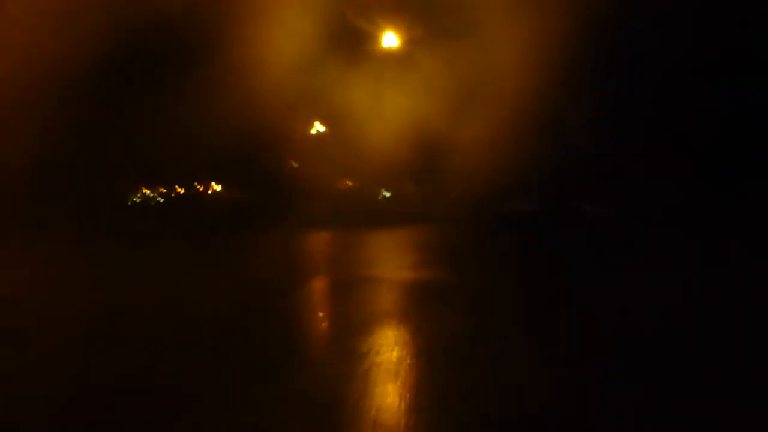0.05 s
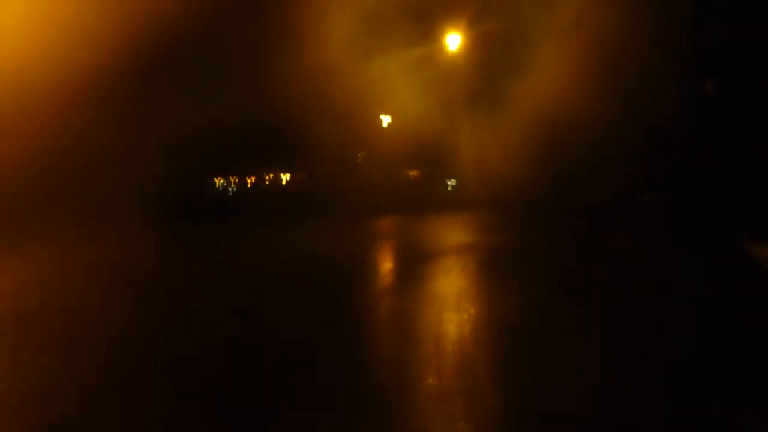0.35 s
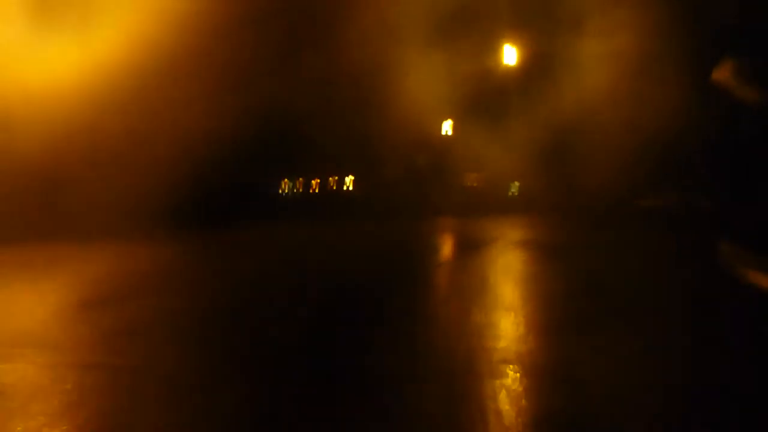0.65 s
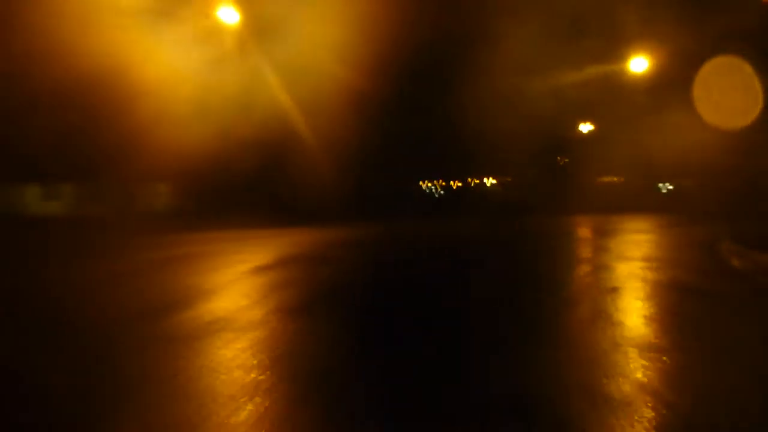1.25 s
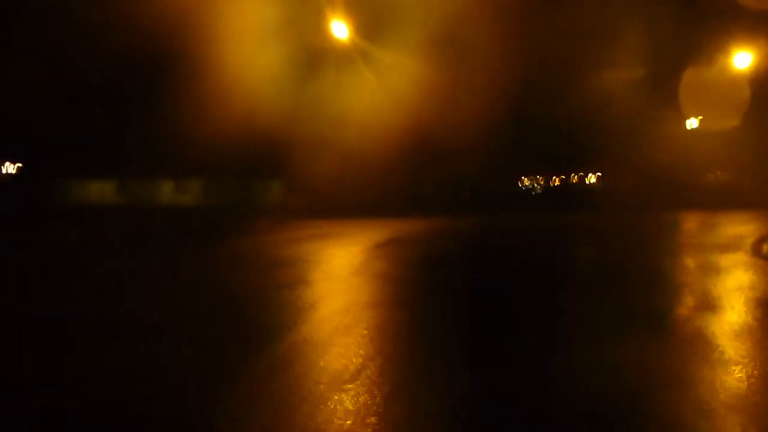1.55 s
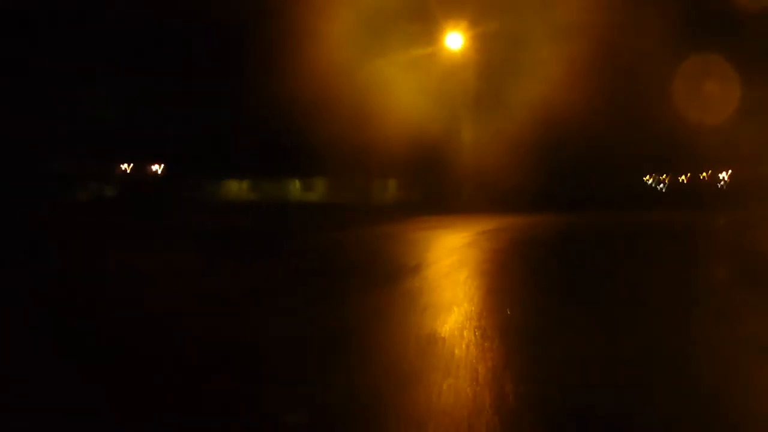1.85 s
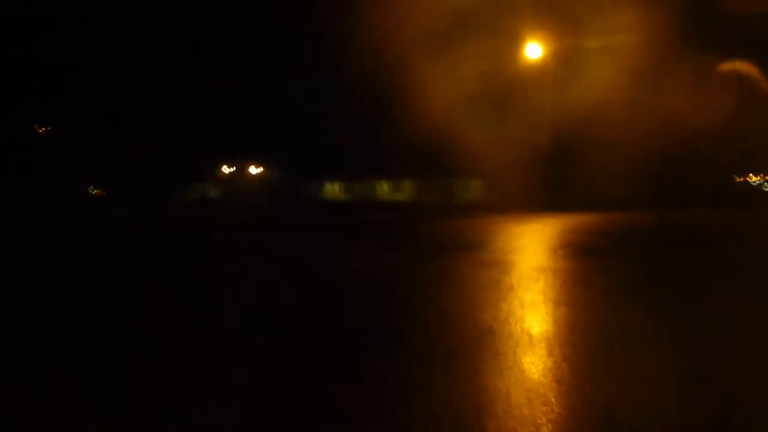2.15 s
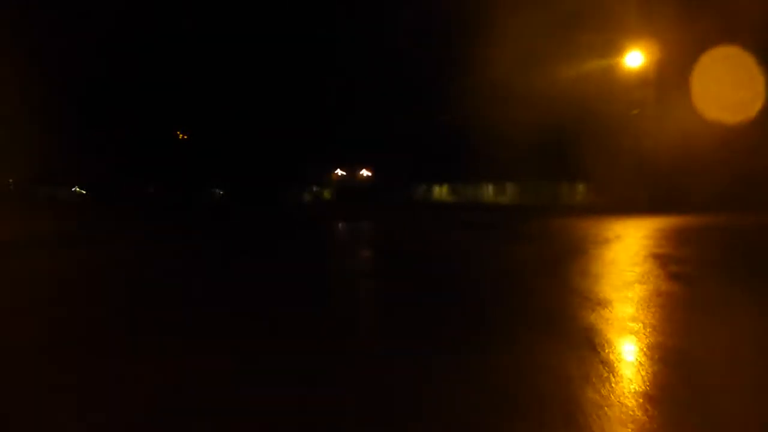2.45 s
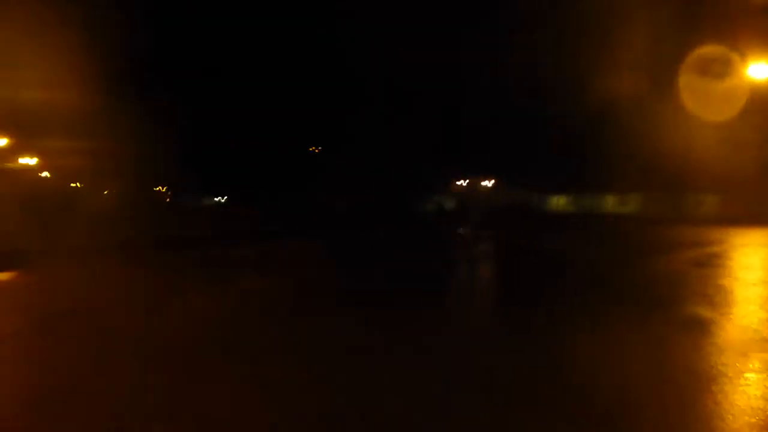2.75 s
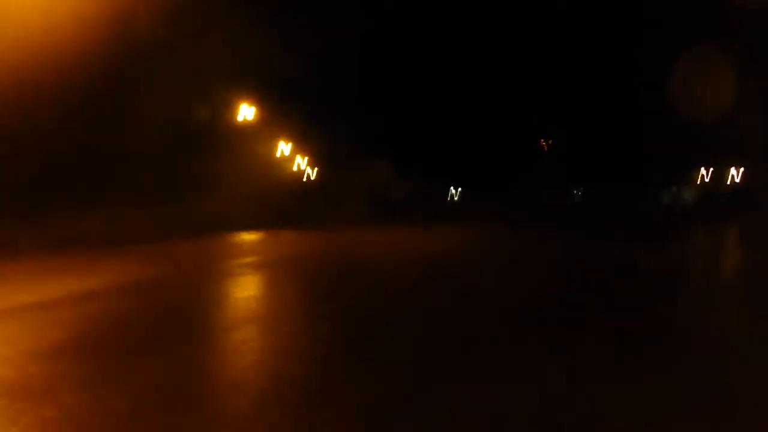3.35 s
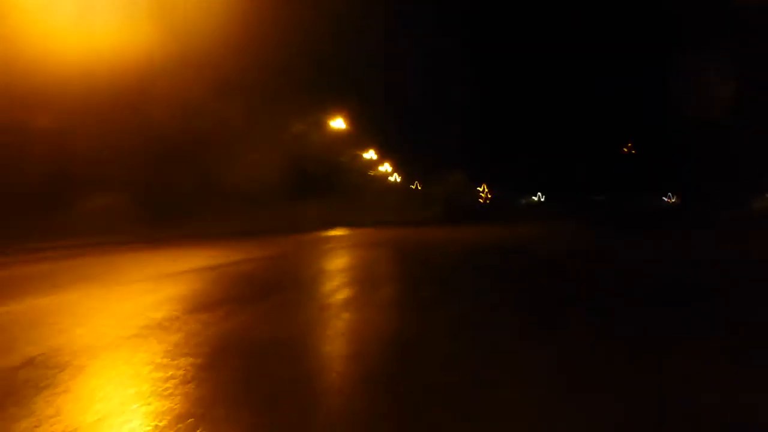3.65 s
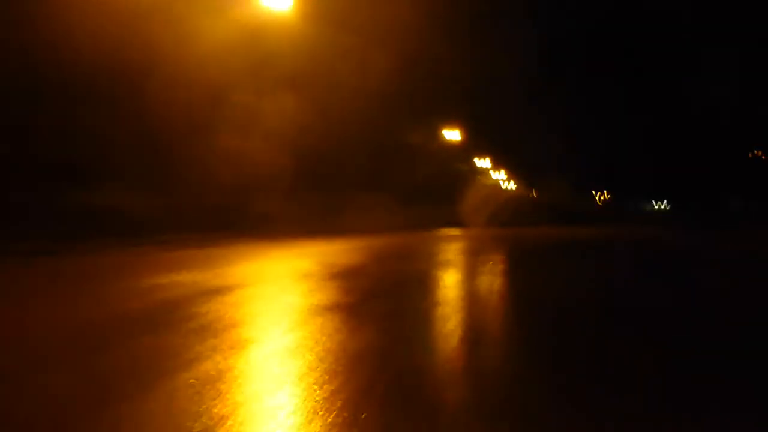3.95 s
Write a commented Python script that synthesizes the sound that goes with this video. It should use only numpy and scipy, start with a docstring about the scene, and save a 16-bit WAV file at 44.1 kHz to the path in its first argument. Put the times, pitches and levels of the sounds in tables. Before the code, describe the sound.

A car exhaust burbles and pops, then revs hard three times on a wet road.

```python
"""The exhaust of a six-cylinder car, heard close by from outside, on a wet road.
Each firing sends a pressure pulse and a puff of turbulent gas through the resonant pipe.
The car coasts, burbling and popping with ragged combustion and unburnt fuel, then pulls three times,
dropping to a low hum whenever the throttle closes. Under it the tyres hiss through standing water,
a few large drops strike the car, and road and air give a faint roar."""
import sys
import numpy as np
from scipy import signal
from scipy.fft import rfft, irfft
from scipy.io import wavfile
from scipy.ndimage import uniform_filter1d

SR = 44100
rng = np.random.default_rng(int(sys.argv[2]) if len(sys.argv) > 2 else 0)


def output_pcm(signal):
    """Save a mono or channel-first signal as 16-bit PCM at the path in sys.argv[1].

    Samples are clipped to [-1, 1] before scaling.
    """
    pcm = np.clip(np.atleast_2d(signal).T, -1, 1) * 32767
    wavfile.write(sys.argv[1], SR, np.round(pcm).astype(np.int16))


N = 176400
T = np.arange(N) / SR

# Throttle. Each row: time in seconds, strength of the firings in dB.
THROTTLE = [(0, -28), (.9, -15), (.94, -7.5), (1.03, -1.5), (1.24, -2), (1.265, -29), (1.3, -16),
            (1.312, 1.5), (1.5, 1), (1.75, -1.5), (2.3, 0.5), (2.495, 2), (2.515, -14), (2.75, -8.5),
            (2.762, 2.5), (2.88, 3.5), (3.05, 1.5), (3.355, 1.5), (3.39, -12.5), (3.515, -11), (3.54, -3),
            (3.64, 2.5), (3.845, 1.5), (3.875, -5.5), (4, -10)]
# Spectrum of splashing water. Each row: frequency in Hz, relative level in dB.
WATER_SPECTRUM = [(25, 4), (200, 9.5), (1500, 7), (2800, 3), (3600, -2.5), (4000, 3), (4350, -5), (4800, 3),
                  (6500, -5), (8500, -9.5), (10000, -18), (14000, -19.5), (16000, -28.5)]


def amp(db):
    """Amplitude grows tenfold for every 20 dB."""
    return 10 ** (np.asarray(db) / 20)


def unit(x):
    """Normalisation to an rms of one."""
    return x / np.sqrt(np.mean(x ** 2) + 1e-20)


def curve(points):
    """Linear interpolation of (time, value) rows at every sample."""
    return np.interp(T, *np.transpose(points))


def drift(hz):
    """Slow random fluctuation: low-passed noise with an rms of one."""
    rolloff = 1 + (np.fft.rfftfreq(N, 1 / SR) / hz) ** 4
    return unit(irfft(rfft(rng.standard_normal(N)) / rolloff, N))


def colour(x, spectrum, size=8192):
    """Causal, minimum-phase filtering by a spectrum of (Hz, dB) rows."""
    hz, db = np.transpose(spectrum)
    log_hz = np.log(abs(np.fft.fftfreq(size, 1 / SR)) + 1)
    log_gain = np.log(amp(np.interp(log_hz, np.log(hz), db)))
    response = np.fft.ifft(np.exp(np.conj(signal.hilbert(log_gain)))).real[:size // 2]
    return signal.fftconvolve(x, response)[:N]


def split(x, hz):
    """Complementary filtering into the parts below and above a frequency."""
    low = signal.sosfiltfilt(signal.butter(5, hz, fs=SR, output="sos"), x)
    return low, x - low


def resonance(x, hz, db, width_hz=100):
    """A resonance or antiresonance boosts or cuts a narrow band whose centre may move."""
    carrier = np.exp(2j * np.pi * np.cumsum(hz) / SR)
    pole = np.exp(-np.pi * width_hz / SR)
    band = 2 * (carrier * signal.filtfilt([1 - pole], [1, -pole], x / carrier)).real
    return x + (amp(db) - 1) * band


def impulses(times, heights):
    """An impulse train, each impulse shared linearly between two neighbouring samples."""
    at, out = np.clip(times * SR, 0, N - 2), np.zeros(N)
    np.add.at(out, at.astype(int), heights * (1 - at % 1))
    np.add.at(out, at.astype(int) + 1, heights * (at % 1))
    return out


def road_roar():
    """Road and air form a diffuse field, uncorrelated left and right, a little louder under load."""
    # Each row: frequency in Hz, relative level in dB.
    spectrum = [(25, -16.5), (90, -11), (200, -21.5), (600, 15), (1100, 6), (2000, -7), (4000, -21.5),
                (10000, -59)]
    sides = np.array([unit(colour(rng.standard_normal(N), spectrum)) for _ in range(2)])
    return sides * amp(-44 + 0.18 * curve(THROTTLE))


def drop_impacts(decay_s=0.0067):
    """The impact of a large drop on the car is a burst of bright noise that decays exponentially."""
    # Each row: start in seconds, level in dB.
    drops = [(.171, -55), (1.095, -54), (1.835, -49), (2.05, -57)]
    envelope = sum(amp(db) * (T >= start) * np.exp(-abs(T - start) / decay_s) for start, db in drops)
    _, splash = split(colour(rng.standard_normal(N), WATER_SPECTRUM), hz=2300)
    return envelope * unit(splash)


def tyre_spray(drops_per_s=200, coherence=0.3):
    """Droplets thrown up by the tyres add incoherently to a hiss, partly shared by the two sides."""
    # The whole spray, and swells of its finest part. Each row: time in seconds, gain in dB.
    level = [(0, -54), (.4, -56.5), (.5, -53.5), (.62, -56), (.8, -53), (1.22, -56.5), (1.44, -50.5),
             (1.6, -54.5), (1.76, -43), (1.8, -48.5), (1.85, -48), (2, -51), (2.45, -50.5), (2.68, -52.5),
             (3.15, -49), (3.7, -53), (4, -53)]
    fizz_level = [(0, 1.5), (1.38, 0.5), (1.45, 3.5), (1.56, 0.5), (1.74, -1), (1.85, -0.5), (2.05, -7.5),
                  (2.4, -1.5), (2.53, 1), (2.7, 9), (2.85, -2.5), (3.5, -1), (3.7, -3), (4, 7)]

    def water():
        arrivals = rng.random(N) < drops_per_s / SR
        drops = arrivals * amp(3 * np.minimum(rng.exponential(1, N), 4))
        return unit(colour(rng.standard_normal(N) + 0.22 * unit(drops), WATER_SPECTRUM))

    sides = np.sqrt(coherence) * water() + np.sqrt(1 - coherence) * np.array([water(), water()])
    hiss, fizz = split(sides, hz=7500)
    patchy = hiss * amp(0.7 * drift(hz=16)) + fizz * amp(curve(fizz_level) + 3 * drift(hz=15))
    return patchy * amp(curve(level)) * amp([[1.5], [-1.5]])  # louder on the left


def fuel_pops(jump_s=0.00009):
    """Unburnt fuel excites the pipe impulsively: a pressure jump cracks, a swelling sputter thuds."""
    # Each row: start in seconds, peak in dB, rise time of the sputter in seconds, share of crack.
    pops = [(.009, -11, .002, 1), (0.0134, -3, 0.0027, 0.34), (.128, -11.5, .002, 1),
            (.135, -10.5, 0.0053, 0.31), (.170, -7.5, 0.00092, 1), (0.206, -15.5, 0.004, 0.13),
            (.243, -13.5, .003, 0.2), (0.257, -17, 0.0021, 0.18), (0.287, -13, 0.0037, 0.2),
            (.31, -9.5, 0.0018, 0.33), (.33, -4.5, .001, 0.8), (.334, -15.5, 0.0018, .5),
            (.38, -18, 0.0026, 0.5), (.402, -12.5, 0.0022, 0.25), (.548, -17, 0.0051, 0),
            (.648, -20, .003, 0.6), (.677, -13.5, 0.0092, .1), (0.767, -23, 0.0046, 0.09),
            (.801, -15, 0.0039, 0.23), (0.904, -14.5, 0.01, 0), (2.704, -16, 0.0043, 0.4),
            (2.829, -5.5, 0.0022, 0.9), (3.445, -16, 0.0035, 0.3), (3.653, -15.5, .002, 0.8),
            (3.903, -26, .003, 0.45)]
    # Each row: frequency in Hz, relative level in dB.
    spectrum = [(30, -36.5), (55, -16), (85, 0), (230, 4), (320, -6), (430, 8), (600, 7), (720, -2),
                (850, -20), (1000, -10), (1180, -13), (1400, -22.5), (1800, -25.5), (2300, -37.5),
                (3200, -52), (8000, -77)]
    out = np.zeros(N)
    for start, db, rise_s, crack in pops:
        age = np.maximum(T - start, 0)
        jump = unit(np.exp(-age / jump_s) * (T >= start))
        sputter = unit(rng.standard_normal(N) * age * np.exp(-age / rise_s))
        pop = colour(crack * jump + (1 - crack) * sputter, spectrum)
        out -= amp(db) * pop / abs(pop).max()
    return out


def burble(times, puffs):
    """Ragged combustion excites a wandering resonance, most on a closed or just opening throttle."""
    # Each row: frequency in Hz, relative level in dB.
    spectrum = [(30, -45.5), (50, -32), (80, -4), (140, -0.5), (240, 1.5), (320, -3), (420, 0.5),
                (500, -3.5), (590, 4.5), (700, -11), (850, -17.5), (1000, -14.5), (1150, -12), (1320, -32),
                (1700, -29), (2200, -44.5), (3200, -64.5), (8000, -71)]
    # The whole burble, and its treble. Each row: time in seconds, gain in dB.
    level = [(0, -25), (.25, -27), (.45, -26), (.7, -26.5), (.92, -21.5), (1.05, -24), (1.28, -23),
             (1.36, -27), (1.7, -40.5), (2.45, -40), (2.56, -30.5), (2.68, -30), (2.74, -22.5),
             (2.8, -33.5), (3.05, -40.5), (3.33, -30.5), (3.38, -24.5), (3.46, -30), (3.55, -20),
             (3.62, -30), (3.75, -38.5), (3.88, -35), (4, -24.5)]
    treble_level = [(0, 2.5), (.9, 0.5), (1.3, 0), (2.55, 6.5), (2.72, 6.5), (2.85, -2), (3.4, -2),
                    (3.6, 2.5), (4, -2.5)]
    pushes = np.tanh(rng.standard_normal(len(times)))
    slugs = unit(colour(impulses(times, pushes), spectrum))
    turbulence = puffs * rng.standard_normal(N) * amp(2 * np.tanh(drift(hz=36)))
    gas = unit(colour(turbulence, spectrum))
    clumps = amp(1.5 * np.tanh(drift(hz=27.8)))
    centre_hz = 540 * (1 + 0.13 * drift(hz=10))
    ragged = resonance((slugs + 0.93 * gas) * clumps, centre_hz, db=6)
    body, treble = split(unit(ragged), hz=800)
    return (body + treble * amp(curve(treble_level))) * amp(curve(level))


def gas_rush(puffs):
    """Turbulent gas noise, amplitude-modulated by the firings, grows with the throttle."""
    # Each row: frequency in Hz, relative level in dB.
    spectrum = [(40, -42), (120, -19), (320, -10), (450, -9), (650, -.5), (900, -6.5), (1150, -4),
                (1450, -12), (1900, -17), (2300, -23), (2800, -29.5), (3500, -33.5), (5000, -39.5),
                (7000, -55.5), (10000, -72)]
    # Each row: time in seconds, level in dB before the throttle is added.
    level = [(0, -41), (1.2, -46.5), (1.45, -34.5), (1.8, -32.5), (2.3, -32), (2.5, -40.5), (2.77, -43.5),
             (2.95, -34.5), (3.3, -32.5), (3.65, -35), (4, -36)]
    return unit(colour(puffs * rng.standard_normal(N), spectrum)) * amp(curve(level) + curve(THROTTLE))


def drone(firings):
    """The silencer booms at the firing fundamental; the pipe hums at its subharmonic, an octave down."""
    # The boom leads under load, the hum off the throttle. Each row: time in seconds, level in dB.
    boom_level = [(0, -32.5), (.92, -31), (1.06, -24), (1.22, -25.5), (1.28, -31), (1.38, -21.5),
                  (1.58, -21.5), (1.75, -17.5), (2.12, -15), (2.42, -18.5), (2.49, -21.5), (2.53, -59),
                  (2.72, -36), (2.79, -25), (2.92, -20), (3.34, -17), (3.39, -47), (3.51, -44.5),
                  (3.57, -30), (3.64, -19), (3.8, -19), (3.85, -22), (3.89, -44), (4, -61)]
    hum_level = [(0, -33), (.5, -31), (.92, -33), (1.1, -53), (1.4, -42.5), (1.75, -33.5), (2.3, -31.5),
                 (2.46, -32), (2.5, -38), (2.54, -28), (2.68, -25.5), (2.78, -44.5), (2.88, -33),
                 (3.3, -27), (3.38, -30), (3.44, -30), (3.52, -22.5), (3.57, -38), (3.64, -27), (3.85, -32),
                 (3.91, -24), (4, -24.5)]

    def tone(cycles, flutter):
        waver = 1 + flutter * (drift(hz=34.3) + 1j * drift(hz=34.3))
        return (waver * np.exp(2j * np.pi * cycles)).real

    boom = amp(curve(boom_level)) * tone(firings - 0.075, flutter=0.05)  # trails the pulse
    hum = amp(curve(hum_level)) * tone(firings / 2, flutter=0.08)
    return -np.sqrt(2) * (boom + hum)


def exhaust_pulses(times, firing_hz, jitter_s=0.000012):
    """A pulse train gives harmonics of the firing rate; unequal banks and cylinders add lines between."""
    # Spectra of what all firings share, of the difference between banks and of that between cylinders.
    # Each row: frequency in Hz, gain in dB.
    common_spectrum = [(40, -71), (120, -32), (200, -33.5), (270, -22), (335, -29.5), (400, -27),
                       (435, -24.5), (480, -28.5), (505, -28), (590, -25), (620, -22.5), (660, -23.5),
                       (715, -32.5), (800, -42.5), (960, -43.5), (1180, -47), (1420, -54.5), (1900, -64),
                       (2800, -85.5), (6000, -102)]
    bank_spectrum = [(60, -62.5), (150, -46), (250, -27.5), (300, -34.5), (360, -41), (420, -25.5),
                     (495, -23.5), (550, -25.5), (595, -18), (690, -30.5), (760, -30), (830, -34.5),
                     (885, -37.5), (985, -39), (1090, -33), (1200, -40), (1310, -40.5), (1430, -55.5),
                     (1680, -58.5), (2200, -73), (6000, -101.5)]
    cylinder_spectrum = [(30, -90), (70, -62), (150, -44.5), (320, -44.5), (440, -32), (520, -33.5),
                         (570, -25), (640, -23.5), (700, -23.5), (800, -36), (900, -47.5), (1150, -39),
                         (1350, -55), (2000, -76), (6000, -108)]
    # Each entry: one cylinder's departure from the mean strength, in firing order.
    departures = [0.41, 0.52, -0.51, -0.15, -0.37, -0.55]
    # Imbalance of the banks, imbalance of the cylinders, and the treble, weaker at part throttle.
    # Each row: time in seconds, gain in dB.
    bank_imbalance = [(0, -4.5), (1.1, 0.5), (1.5, 0), (1.9, 2), (2.3, -1.5), (2.48, -0.5), (2.8, -8),
                      (2.87, -2), (3.05, -4.5), (3.6, -1), (3.85, -3)]
    cylinder_imbalance = [(0, -4), (1.05, 3.5), (1.5, 2), (1.85, -3), (2.4, -1), (2.85, 0), (3.15, -1),
                          (3.7, 0), (4, 0)]
    treble_level = [(0, -8.5), (.9, -11.5), (1.22, -13.5), (1.35, -10.5), (1.55, -6), (1.8, 1), (2.15, 2),
                    (2.48, 0), (2.55, -21), (2.77, -5), (2.95, -0.5), (3.33, 1), (3.42, -13), (3.54, -5.5),
                    (3.65, 2), (3.84, -5.5), (3.9, -3), (4, -8)]
    # Pipe resonances shifting with the gas flow. Each row: time in seconds, centre in Hz, gain in dB.
    low_mode = [(0, 420, 0.5), (1.1, 428, 5.5), (1.38, 420, -1), (1.55, 415, -5), (1.75, 425, 2),
                (2.7, 410, -1.5), (2.78, 410, 3.5), (2.89, 450, 2), (3.05, 466, -0.5), (3.65, 480, -3.5),
                (4, 450, -1)]
    high_mode = [(0, 703, 6), (1, 682, -12), (1.24, 705, -4.5), (1.32, 660, -1), (1.42, 700, -6.5),
                 (1.53, 690, 3.5), (1.62, 717, -4.5), (1.75, 647, 2.5), (2.35, 680, -2.5), (2.45, 655, 1.5),
                 (2.6, 608, 7), (2.78, 604, 1.5), (2.86, 630, -7), (2.95, 680, 3), (3.1, 637, -0.5),
                 (4, 605, 1)]
    index = np.arange(len(times))
    scatter, jitter = rng.standard_normal((len(times), 2)).T
    onsets = times + jitter_s * jitter
    height = np.interp(times, T, amp(curve(THROTTLE)) * SR / firing_hz) / np.sqrt(2)
    bank = (-1) ** index * np.interp(times, T, amp(curve(bank_imbalance)))
    cylinder = np.array(departures)[index % len(departures)] + 0.09 * scatter
    cylinder *= np.interp(times, T, amp(curve(cylinder_imbalance)))
    pulses = (colour(impulses(onsets, height), common_spectrum)
              + colour(impulses(onsets, height * bank), bank_spectrum)
              + colour(impulses(onsets, height * cylinder * 2), cylinder_spectrum))
    for mode in (low_mode, high_mode):
        at, hz, db = np.transpose(mode)
        pulses = resonance(pulses, np.interp(T, at, hz), np.interp(T, at, db))
    body, treble = split(pulses, hz=750)
    return -(body + treble * amp(curve(treble_level)))


def scene():
    """Superposition: the engine layers share the crankshaft's phase; pops, water and road add to them."""
    # Engine speed. Each row: time in seconds, firings per second.
    speed = [(0, 204), (.25, 190), (.5, 184), (.75, 174), (.93, 173), (1.03, 170.5), (1.14, 168),
             (1.24, 163.8), (1.348, 164.4), (1.396, 169.6), (1.432, 171.6), (1.55, 166), (1.634, 172.2),
             (1.716, 182.8), (1.8, 192.8), (2.004, 199.4), (2.096, 199.8), (2.166, 206.6), (2.228, 216),
             (2.276, 220.4), (2.386, 218), (2.49, 218), (2.55, 206), (2.7, 198), (2.76, 201),
             (2.832, 213.4), (2.996, 228), (3.052, 232.4), (3.124, 232), (3.226, 237.4), (3.25, 240.2),
             (3.31, 242), (3.37, 233), (3.43, 216), (3.51, 217), (3.55, 228), (3.63, 244.4), (3.814, 237.2),
             (3.86, 232), (3.9, 216), (4, 208)]
    firing_hz = uniform_filter1d(curve(speed), size=1500) * (1 + 0.001 * drift(hz=18))
    firings = np.cumsum(firing_hz) / SR
    times = np.interp(np.arange(int(firings[-1]) + 1), firings, T)
    puffs = 0.25 + np.exp(-(firings % 1) / 0.27)  # steady flow plus a decaying puff per firing
    engine = exhaust_pulses(times, firing_hz) + drone(firings) + gas_rush(puffs) + burble(times, puffs)
    return engine + fuel_pops() + tyre_spray() + drop_impacts() + road_roar()


def record(dry):
    """Band limiting: a linear-phase low-pass removes the highest treble."""
    lowpass = signal.firwin(511, 15200, window=("kaiser", 9), fs=SR)
    return signal.oaconvolve(dry, lowpass[None], "same")


dry = scene()
out = record(dry)
output_pcm(out)
```